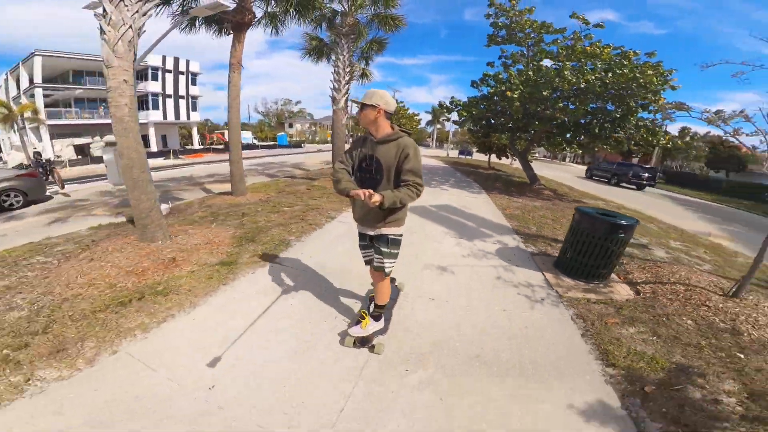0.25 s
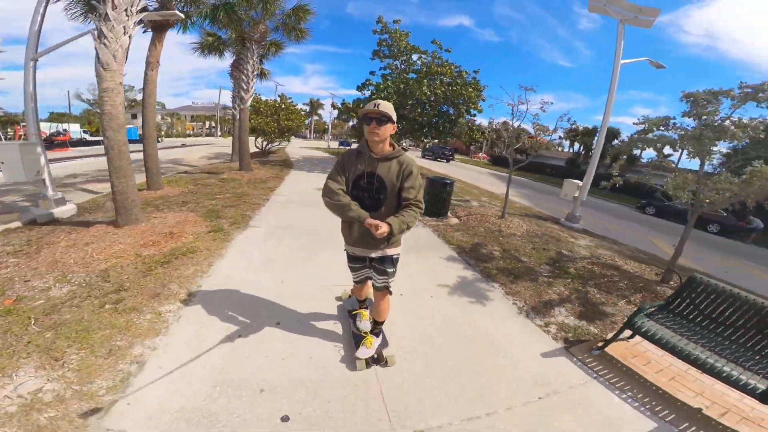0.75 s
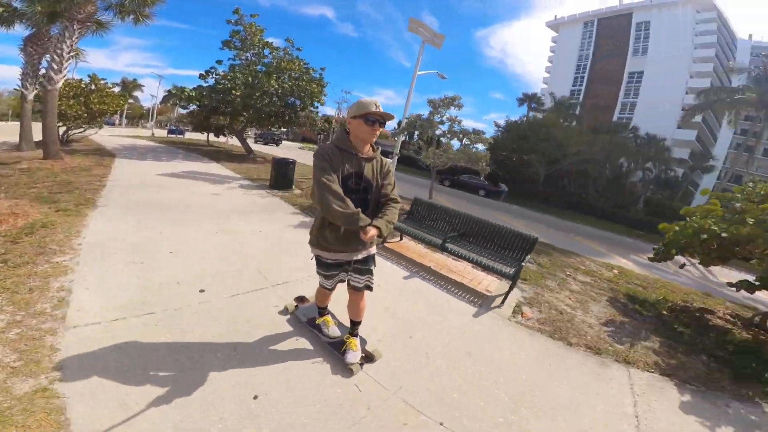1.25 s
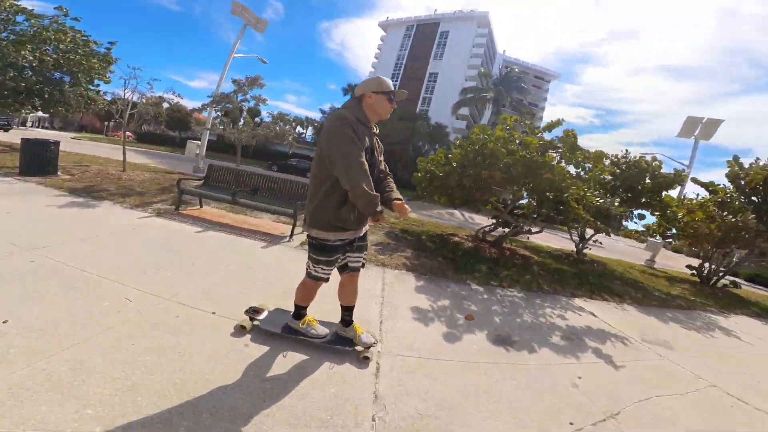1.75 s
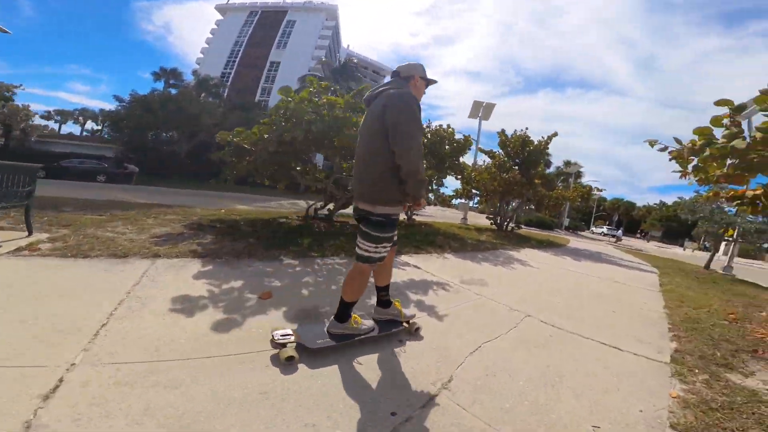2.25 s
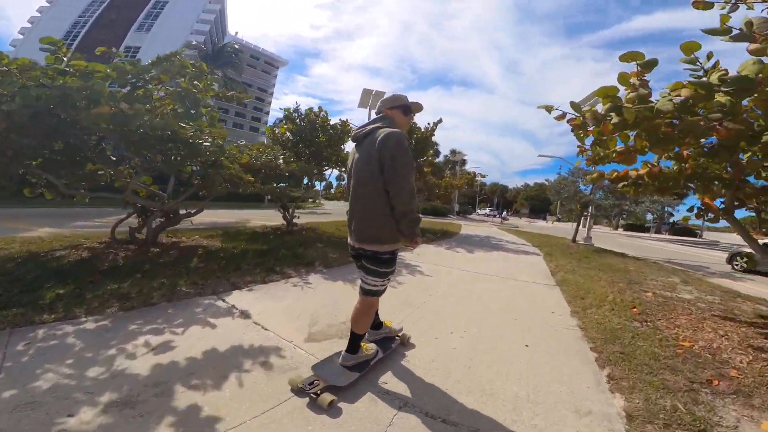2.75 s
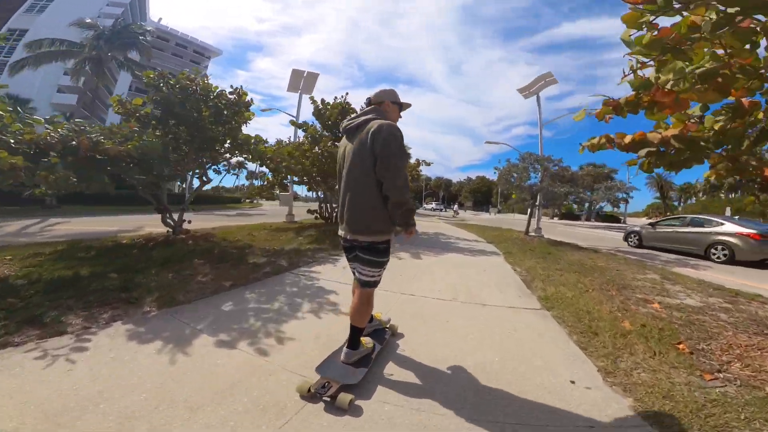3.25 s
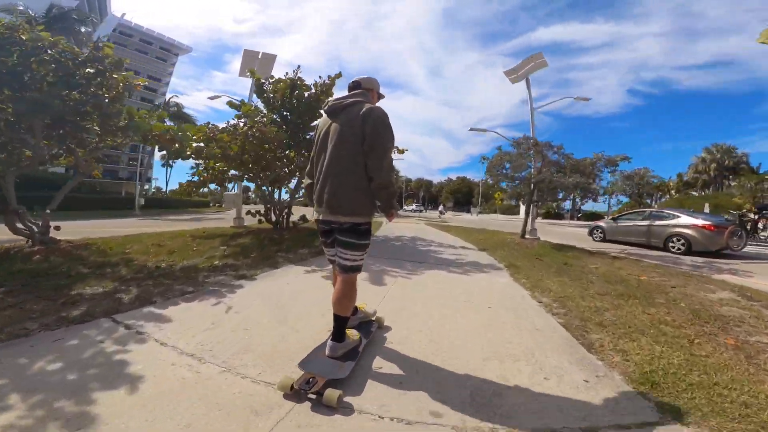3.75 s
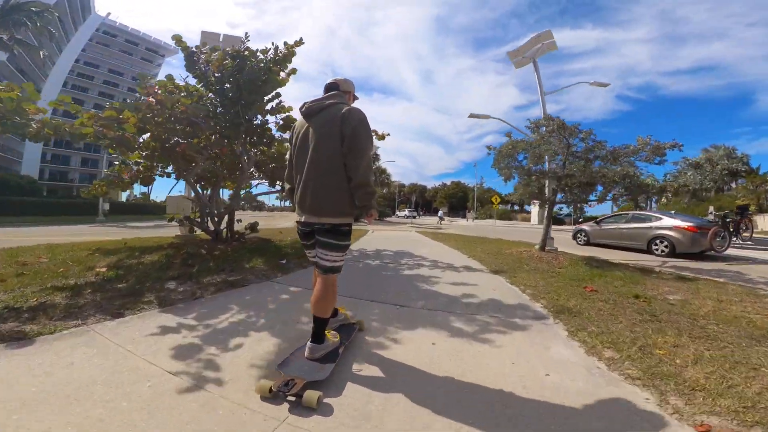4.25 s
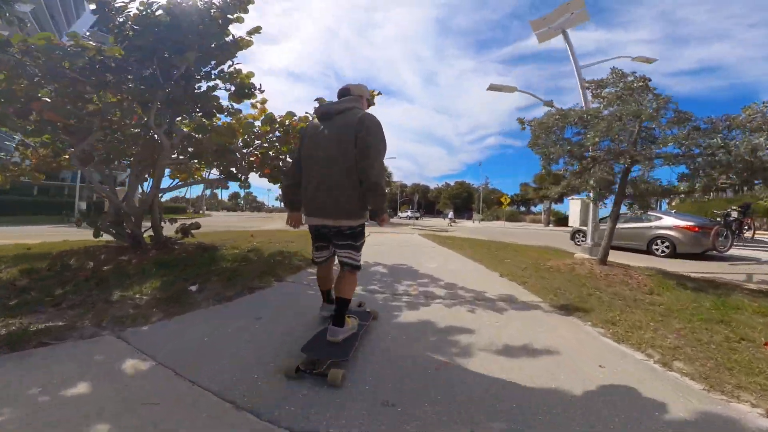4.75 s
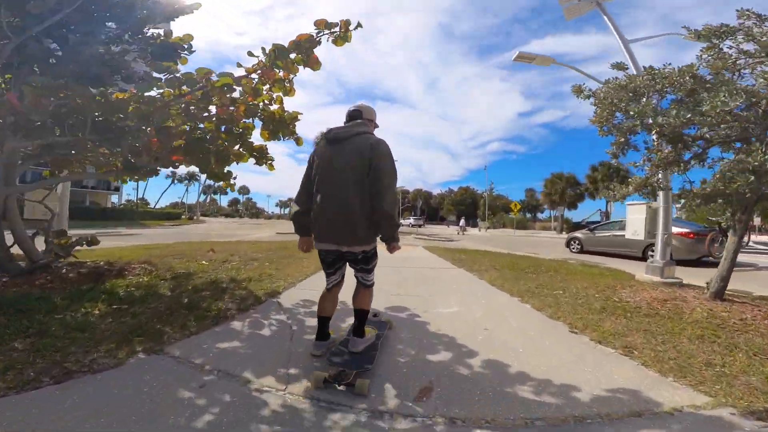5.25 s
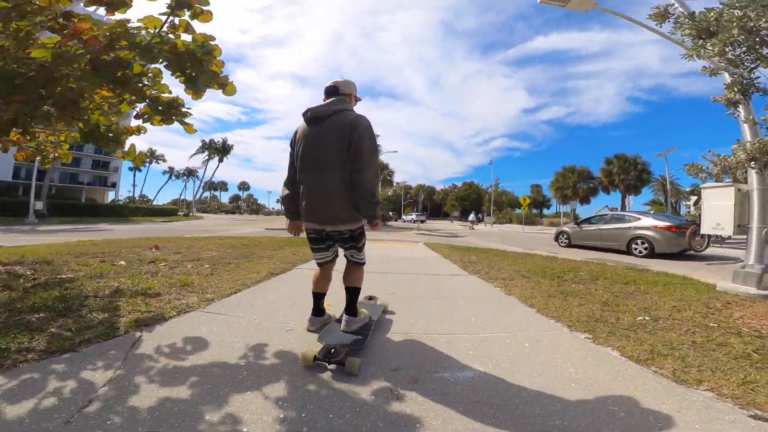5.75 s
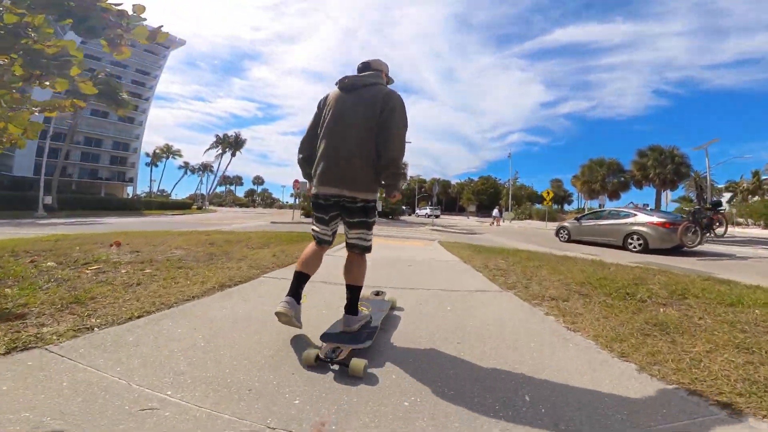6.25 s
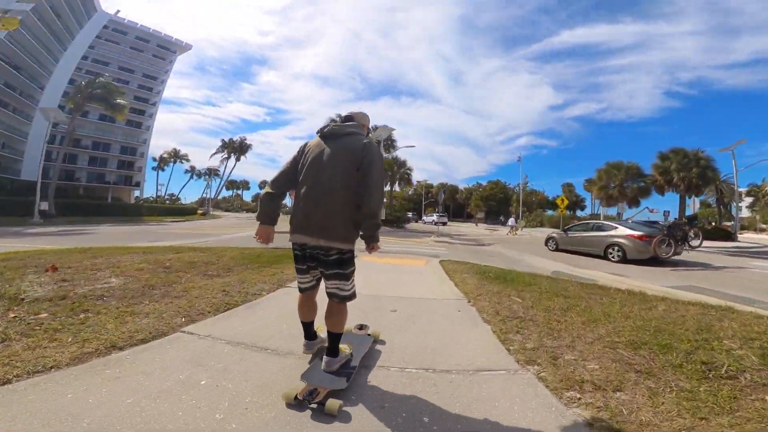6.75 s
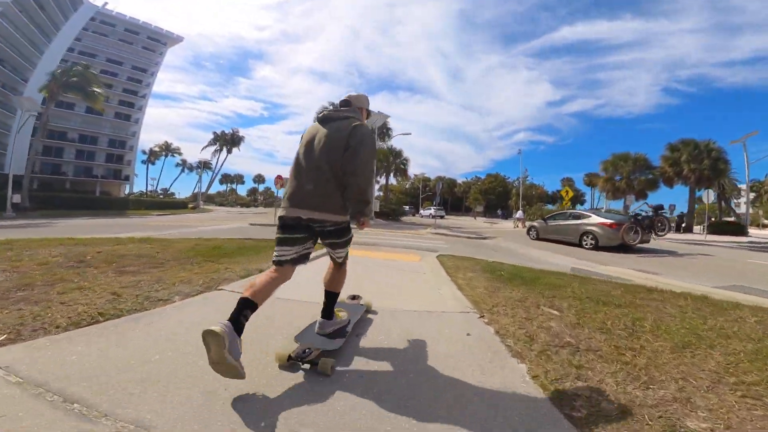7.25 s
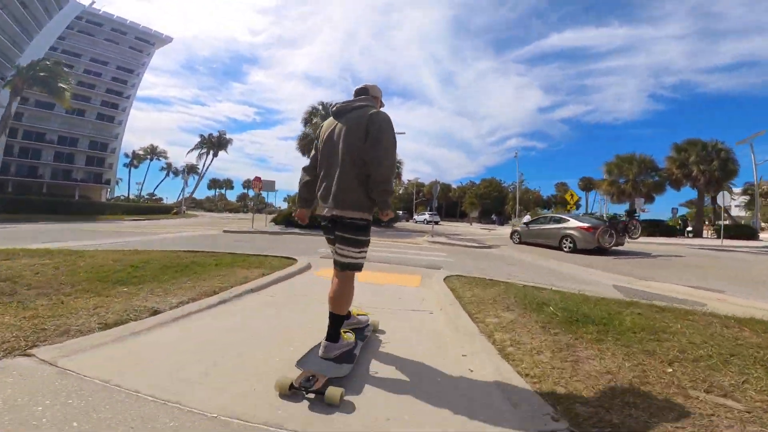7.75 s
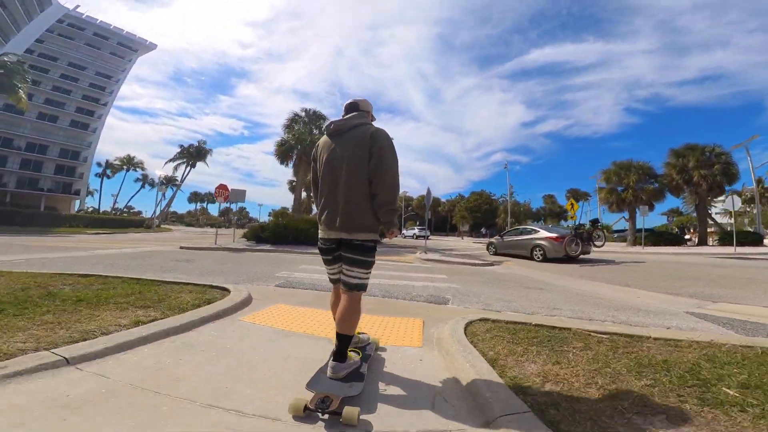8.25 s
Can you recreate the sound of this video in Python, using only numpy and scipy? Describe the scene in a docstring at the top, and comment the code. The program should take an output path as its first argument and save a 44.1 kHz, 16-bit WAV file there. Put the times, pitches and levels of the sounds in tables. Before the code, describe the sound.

Close, low rumbling of skateboard wheels on rough concrete runs throughout, picked up by a microphone moving with the board. Sidewalk cracks bring irregular rattling knocks and soft wooden thumps, with a few tiny hard ticks between them. The roll softens in the second half, where two brief hollow foot pushes are heard, then picks up a little with more clacks.

```python
"""Longboard on concrete slabs

Heard from a pole held by the rider, the rough surface drives deck, trucks and wheels into forced
vibration. Each joint gives a rattling burst, front wheels then rear. Soft bumps make the deck boom,
small hard ticks come now and then, and the board sounds hollow while a foot pushes off."""
import sys
import numpy as np
from scipy import signal
from scipy.io import wavfile
from scipy.ndimage import uniform_filter1d

SR = 44100
rng = np.random.default_rng(int(sys.argv[2]) if len(sys.argv) > 2 else 0)


def store_pcm(level_fs):
    """Save levels as 16-bit WAV."""
    pcm = np.round(np.clip(level_fs, -1, 1) * 32767).astype(np.int16)
    wavfile.write(sys.argv[1], SR, np.atleast_2d(pcm).T)


N = 374850

# rolling excitation: time_s, deck_db, trucks_db, wheels_db
ROLLING_LEVELS = [(0.0, -24.5, -32, -55), (1.02, -29, -37, -64), (1.75, -29, -38.5, -57),
                  (2.65, -27.5, -39.5, -52.5), (2.98, -31, -38, -52.5), (3.4, -29, -43, -61),
                  (4.95, -32, -37.5, -53.5), (5.16, -28, -37.5, -56), (5.56, -39, -48.5, -67),
                  (5.75, -34, -46.5, -68), (6.06, -38.5, -41.5, -57.5), (6.27, -35.5, -52.5, -66.5),
                  (6.6, -35.5, -47, -78.5), (7.1, -36.5, -45.5, -65.5), (7.25, -32, -36, -48),
                  (7.39, -34, -42, -56.5), (7.44, -34, -44, -62.5), (8.19, -30.5, -39.5, -59.5),
                  (8.5, -29, -36, -54)]
# wheels crossing joints and bumps: start_s, trucks_db, deck_db, grit_db, nominal_length_s
CROSSINGS = [(0.021, -45, -11.5, -57, 0.011), (0.229, -16.5, -20, -42, 0.031),
             (0.447, -14.5, -26, -54, 0.018), (0.878, -25, -21, -69, 0.016),
             (1.091, -16, -27, -40.5, 0.024), (1.319, -14, -11.5, -47.5, 0.023),
             (1.962, -13, -15, -36.5, 0.026), (2.199, -13, -8.5, -36.5, 0.025),
             (2.769, -5.5, -21, -34.5, 0.022), (3.014, -10.5, -15, -41, 0.038),
             (3.232, -19, -23, -67, 0.014), (3.691, -14, -18, -46, 0.028), (3.93, -10, -19.5, -38, 0.037),
             (4.16, -23, -22.5, -51.5, 0.026), (4.605, -16.5, -18, -47.5, 0.033),
             (4.838, -14, -25, -45, 0.042), (4.925, -18.5, -51, -40.5, 0.021),
             (5.117, -10.5, -16, -49.5, 0.031), (5.327, -19.5, -87, -43.5, 0.021),
             (5.396, -12.5, -31, -43, 0.046), (5.422, -18.5, -25, -50, 0.066),
             (5.779, -26.5, -32, -59, 0.061), (5.829, -33, -58, -42.5, 0.023),
             (6.137, -23, -28.5, -58, 0.06), (6.712, -21, -14.5, -52, 0.04),
             (7.146, -28, -30.5, -41.5, 0.045), (7.474, -17.5, -18.5, -50.5, 0.029),
             (7.847, -19.5, -21, -49, 0.035), (8.468, -10, -28, -68, 0.019)]
# resonances: pitch_hz, bandwidth_hz, level_db
DECK_MODES = [(47, 23, -15), (91.5, 21.9, -4.5), (124.4, 31.4, -0.5), (188.3, 95.7, -8),
              (310.6, 103.5, -13.5)]
THUD_MODES = [(120, 45, 4), (195, 120, 6.5), (339, 250, -1.5)]
TRUCK_MODES = [(389, 73, 6), (617, 267, 6), (1120, 381, 4.5), (1410, 495, -6), (2066, 73, -8)]
WHEEL_MODES = [(2630, 5000, -3.5), (4390, 1800, 6), (6940, 1260, 1), (8860, 1850, 0)]
CRACK_MODES = [(633, 750, 2.5), (1070, 906, 11), (2070, 1570, 3), (3570, 2000, -3.5)]
HOLLOW_MODES = [(586, 52, 11), (1074, 139, 9), (1305, 226, 2), (2040, 240, -8)]
LOOSE_MODES = [(1170, 490, 0.5), (1966, 71, -4.5)]
BEARING_MODES = [(3810, 350, -0.5), (4640, 580, 1.5)]
# deck flexing over soft bumps: centre_s, peak_db, half_width_s, pitch_hz
DECK_BOOMS = [(0.682, -11, 0.0036, 139), (1.535, -21, 0.014, 145), (1.767, -12, 0.0053, 213),
              (1.888, -13.5, 0.0048, 70.5), (2.38, -11, 0.01, 126), (2.447, -22.5, 0.033, 139),
              (2.614, -11.5, 0.017, 112), (4.145, -17, 0.0094, 134), (4.411, -17, 0.0083, 122),
              (5.055, -17.5, 0.08, 121.5), (6.168, -23, 0.019, 82.5), (8.208, -16.5, 0.017, 128)]
# wheels dropping into joints: centre_s, peak_db
JOINT_THUMPS = [(1.979, -10.5), (2.217, -15), (2.774, -7), (3.021, -8), (3.039, -10), (3.955, -11.5),
                (4.862, -13.5), (5.404, -15), (7.393, -21), (8.492, -9.5)]
# woody ringing after knocks: centre_s, peak_db, half_width_s
DECK_RINGS = [(0.463, -21.5, 0.0082), (1.118, -16, 0.0016), (1.351, -23, 0.0088), (1.543, -27.5, 0.006),
              (1.772, -26, 0.0058), (2.79, -19.5, 0.017), (3.04, -18.5, 0.0082), (3.97, -26, 0.019),
              (5.45, -20.5, 0.01), (7.182, -19, 0.023), (7.869, -23.5, 0.012)]
# wheels striking edges or pebbles: start_s, level_db
WHEEL_BLOWS = [(1.3259, -22), (1.9665, -21), (2.7716, -15), (3.694, -16.5), (3.7065, -21), (4.616, -14.5),
               (4.6284, -21), (4.8625, -26), (5.1205, -10.5), (5.137, -15), (5.3335, -36), (5.4056, -17),
               (5.803, -24.5), (6.7165, -26), (6.7388, -31), (7.1485, -26), (7.4773, -24), (8.472, -23)]
# one curve for each push of the foot: time_s, level_db
FOOT_PUSHES = [
    [(5.86, -50), (5.95, -36), (6.125, -37.5), (6.24, -45)],
    [(7.149, -18), (7.185, -25), (7.2, -26.5), (7.285, -29), (7.32, -53)],
]
# a loose truck part shaking: start_s, level_db
LOOSE_RATTLES = [(3.47, -37), (4.133, -38), (4.217, -40), (4.319, -39), (4.443, -39.5), (6.876, -42),
                 (7.58, -38.5), (8.084, -38.5), (8.135, -40), (8.372, -35.5)]
# small hard ticks: start_s, level_db, pitch_hz
HARD_TICKS = [(0.589, -40, 3470), (0.621, -37.5, 3900), (0.6325, -43, 4170), (0.8075, -35.5, 3670),
              (0.9449, -36.5, 4110), (1.688, -42, 3870), (1.7095, -29, 3950), (4.797, -44, 4280),
              (5.057, -43, 3700), (5.497, -41.5, 4740), (5.937, -50.5, 4520)]
# whine of accelerating wheels: time_s, pitch_hz
WHINE_GLIDE = [(7.9, 560), (8.45, 661)]

THUMP_HZ, WOODY_HZ = 294, 643
TREAD_HZ, TRUCKS_TOP_HZ = 4600, 2560   # soft tread and heavy parts pass little above these
DUCK_FROM_DB, DUCK_SHARE, RECOVER_DB_PER_S, DUCK_LAG_S = -26.5, 0.48, 17.5, 0.041


def deck(force, gain, knocked):
    """Forced vibration: the deck drones under steady roughness and thuds at each crossing."""
    return resonate(1.575 * force * gain, DECK_MODES) + resonate(0.93 * force * knocked, THUD_MODES)


def deck_flexure():
    """Transient bending: soft bumps make the deck boom, and a drop into a joint makes it thump."""
    booms = swells(*np.transpose(DECK_BOOMS))
    return booms + swells(*np.transpose(JOINT_THUMPS), half_widths_s=0.0024, pitches_hz=THUMP_HZ)


def trucks(force, gain, knocked, lumps):
    """Forced vibration: rolling and knocks shake the trucks, whose mass limits the treble."""
    shaken = gain * from_db(0.89 * lumps) + 0.46 * knocked
    return low_pass(resonate(force * shaken, TRUCK_MODES, flicker_db=2.37), TRUCKS_TOP_HZ)


def clatter(rattle, gain, knocked):
    """Impact noise: loose parts and crushed grit excite broad resonances."""
    return resonate(rattle * (0.15 * knocked + 0.13 * gain), CRACK_MODES)


def wheel_blows():
    """Contact compliance: the soft tread dulls each sharp blow, and only a little treble escapes."""
    force = chatter(WHEEL_BLOWS, fade_s=0.0028)
    treble = from_db(-39) * resonate(force, WHEEL_MODES)
    return low_pass(resonate(force, CRACK_MODES), TREAD_HZ) + treble


def wheels(noise, grit, gain, knocked, lumps):
    """Rolling noise: fine roughness and sand excite the wheels. Returns the hiss and its envelope."""
    crunch = 1 + signal.lfilter([.03], [1, -.996], abs(grains(60, 2.0)))   # sand grains being crushed
    rolling = gain * crunch * from_db(1.14 * lumps + 1.2 * drift(60.0))
    burst = 1.93 * knocked
    envelope = rolling + burst
    force = noise * envelope + grit * (0.4 * rolling + burst)
    return resonate(force, WHEEL_MODES, flicker_db=1.8), envelope


def hollow_board(force):
    """Resonance: unloaded by the pushing foot, the board sounds hollow."""
    pushing = sum(from_db(in_time(push, outside=-99)[0]) for push in FOOT_PUSHES)
    return resonate(force * from_db(1.5 * drift(30.0)) * pushing, HOLLOW_MODES)


def woody_ring():
    """Free vibration: one mode of the deck rings on unevenly after a knock."""
    return swells(*np.transpose(DECK_RINGS), WOODY_HZ) * (1 + 0.42 * drift(150.0))


def loose_part():
    """Contact chatter: a loose part of the trucks briefly excites its own modes."""
    return low_pass(resonate(chatter(LOOSE_RATTLES, fade_s=0.011), LOOSE_MODES), TRUCKS_TOP_HZ)


def ticks():
    """Heavy damping: each tick rings for a millisecond and leaves a rough, fainter tail."""
    out, t = np.zeros(N), np.arange(int(0.031 * SR)) / SR
    tails = uniform_filter1d(rng.standard_normal((len(HARD_TICKS), len(t))), size=12, axis=1)
    for (start_s, level_db, hz), tail in zip(HARD_TICKS, tails):
        at = round(start_s * SR)
        shape = t / 0.00022 * np.exp(1 - t / 0.0003) + 0.52 * tail * np.exp(-t / 0.016)
        out[at:at + len(t)] += from_db(level_db + 8.5) * shape * np.sin(2 * np.pi * hz * t)
    return out


def bearings(force, gain):
    """Narrow-band noise: the bearings hiss on when the wheels go quiet."""
    level = from_db(-32 + 4.0 * drift(17.0)) * gain
    return level * rms_one(resonate(resonate(force, BEARING_MODES), BEARING_MODES))


def whine():
    """Frequency glide: a faint, wavering tone rises as the wheels gather speed."""
    hz, = in_time(WHINE_GLIDE, outside=0)
    return (hz > 0) * from_db(-48 + 2.6 * drift(18.0)) * np.sin(2 * np.pi * np.cumsum(hz) / SR)


def resonate(force, modes, flicker_db=0):
    """Modal superposition with alternating signs; white force keeps roughly its rms."""
    out, power = 0, 0
    for k, (hz, width_hz, level_db) in enumerate(modes):
        r = np.exp(-np.pi * width_hz / SR)
        poles = [1, -2 * r * np.cos(2 * np.pi * hz / SR), r * r]
        response = (1 - r * r) / 2 * signal.lfilter([1, 0, -1], poles, force + 1e-18)
        out = out + (-1) ** k * from_db(level_db + flicker_db * drift(16.3)) * response
        power += from_db(2 * level_db) * np.pi * width_hz / SR
    return out / np.sqrt(power)


def bursts(starts_s, levels_db, lengths_s, stretch, rise_s):
    """Attack and decay: an envelope that swells and dies as each wheel crosses."""
    out = np.zeros(N)
    for start_s, level_db, length_s in zip(starts_s, levels_db, lengths_s * stretch):
        at = round(start_s * SR)
        t = np.arange(min(int(3 * length_s * SR), N - at)) / SR
        attack = 1 - np.exp(-t / rise_s)
        out[at:at + len(t)] += from_db(level_db) * attack * np.exp(-(t / length_s) ** 1.55)
    return out


def swells(centres_s, peaks_db, half_widths_s, pitches_hz):
    """Wave packets: a mode sounds under a Gaussian envelope, a little off pitch each time."""
    out, t = np.zeros(N), np.arange(N) / SR
    columns = np.broadcast_arrays(centres_s, peaks_db, half_widths_s, pitches_hz)
    for centre_s, peak_db, width_s, hz in zip(*columns):
        detune, phase = rng.uniform(0.95, 1.05), rng.random()
        near = slice(max(round((centre_s - 3 * width_s) * SR), 0), round((centre_s + 3 * width_s) * SR))
        offset_s = t[near] - centre_s
        bell = from_db(peak_db) * np.exp(-(offset_s / width_s) ** 2)
        out[near] += bell * np.sin(2 * np.pi * (hz * detune * offset_s + phase))
    return out


def chatter(contacts, fade_s):
    """Impact force: each hard contact is a short pulse with a decaying, uneven tail."""
    span = 600
    force, fade = np.zeros(N + span), np.exp(-np.arange(span) / SR / fade_s)
    for start_s, level_db in contacts:
        at = round(start_s * SR)
        force[at:at + span] += from_db(level_db) * rng.standard_normal(span) * fade
        force[at:at + 8] += from_db(level_db) * 2
    return force[:N]


def grains(per_s, spread_db):
    """Shot noise: random contacts of uneven size and sign, at unit rms."""
    sizes = from_db(spread_db * np.minimum(rng.exponential(1, N), 5)) * rng.choice([-1, 1], N)
    return rms_one(sizes * (rng.random(N) < per_s / SR))


def drift(rate_hz):
    """Random modulation: low-passed noise at unit rms."""
    r = np.exp(-80 * np.pi * rate_hz / SR)   # one step every 40 samples
    slow = signal.lfilter([1], [1, -2 * r, r * r], rng.standard_normal(N // 40 + 2002))[2000:]
    return np.interp(np.arange(N) / 40, np.arange(len(slow)), rms_one(slow))


def in_time(rows, outside=None):
    """Linear interpolation of a table's columns at every sample."""
    times_s, *columns = np.transpose(rows)
    return [np.interp(np.arange(N) / SR, times_s, column, outside, outside) for column in columns]


def low_pass(x, hz):
    """Second-order treble roll-off."""
    return signal.sosfilt(signal.butter(2, hz, fs=SR, output="sos"), x)


def from_db(db):
    """Decibels to amplitude ratio."""
    return 10 ** (np.asarray(db) / 20)


def rms_one(x):
    """Normalisation to unit rms."""
    return x / np.sqrt(np.mean(x ** 2) + 1e-20)


def gain_control(x):
    """Compression: loud moments turn the gain down a little late, and it recovers steadily."""
    level_db = 10 * np.log10(uniform_filter1d(np.mean(x ** 2, axis=0), size=900) + 1e-12)
    excess_db = np.maximum(level_db - DUCK_FROM_DB, 0)
    recovery_db = RECOVER_DB_PER_S * np.arange(N) / SR
    cut_db = np.maximum.accumulate(DUCK_SHARE * excess_db + recovery_db) - recovery_db
    r = np.exp(-1 / (DUCK_LAG_S * SR))
    return x * from_db(-signal.lfilter([1 - r], [1, -r], cut_db))


def scene():
    """Superposition: one surface drives every part; left and right differ only in the wheels' treble."""
    deck_gain, truck_gain, wheel_gain = from_db(in_time(ROLLING_LEVELS))
    starts_s, trucks_db, deck_db, grit_db, lengths_s = np.transpose(CROSSINGS)
    deck_knocks = bursts(starts_s, deck_db, lengths_s, stretch=0.87, rise_s=0.00031)
    truck_knocks = bursts(starts_s, trucks_db, lengths_s, stretch=0.82, rise_s=0.0049)
    grit_knocks = bursts(starts_s, grit_db, lengths_s, stretch=0.85, rise_s=0.0063)
    lumps = drift(7.7)   # uneven concrete shakes trucks and wheels together
    rattle, grit = grains(per_s=900, spread_db=3.24), grains(per_s=3000, spread_db=7.4)
    deck_noise, truck_noise, side_noise, wheel_noise = rng.standard_normal((4, N))
    rough = 0.73 * truck_noise + 0.59 * rattle + 0.4 * grit

    mid = deck(deck_noise, deck_gain, deck_knocks) + clatter(rattle, truck_gain, truck_knocks)
    hiss, hiss_envelope = wheels(wheel_noise, grit, wheel_gain, grit_knocks, lumps)
    mid += hiss + bearings(rough, truck_gain)
    mid += low_pass(hollow_board(rough) + woody_ring() + whine(), TRUCKS_TOP_HZ)
    mid += deck_flexure() + trucks(rough, truck_gain, truck_knocks, lumps)
    mid += wheel_blows() + loose_part()
    side = from_db(-9.5) * resonate(side_noise * hiss_envelope, WHEEL_MODES)
    side = signal.sosfilt(signal.butter(6, 2600, "high", fs=SR, output="sos"), side)
    return mid + ticks() + side * [[1], [-1]]


def record(dry):
    """Saturation and band limiting: compressed peaks are rounded, the treble dulled, the top cut."""
    rounded = 0.82 * np.tanh(gain_control(dry) / 0.59)
    dulled = low_pass(rounded, hz=12100)
    return signal.sosfilt(signal.cheby2(12, 70, 15700, fs=SR, output="sos"), dulled)


dry = scene()
out = record(dry)
store_pcm(out)
```